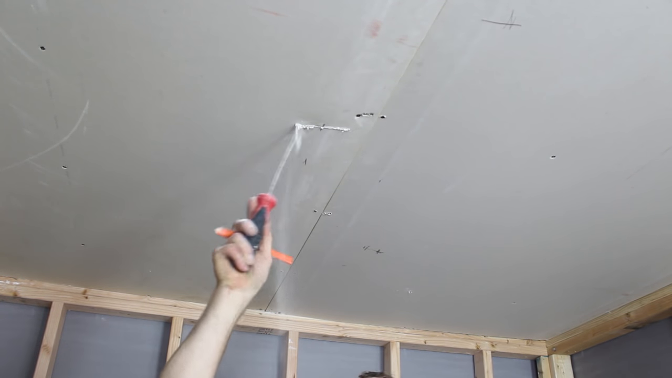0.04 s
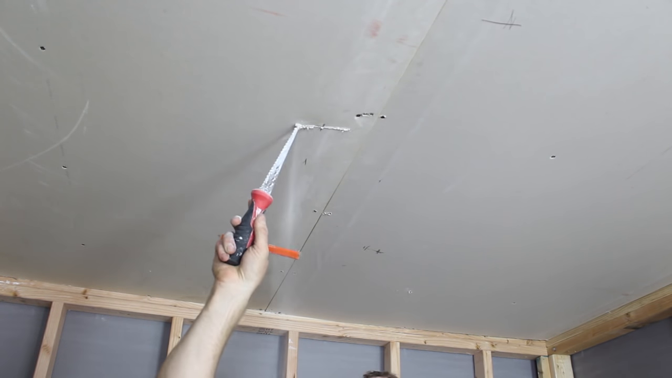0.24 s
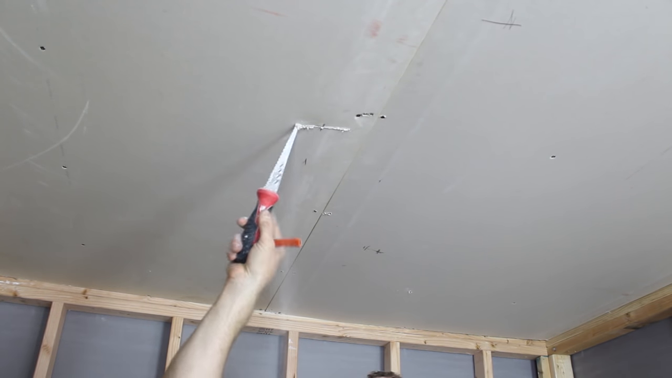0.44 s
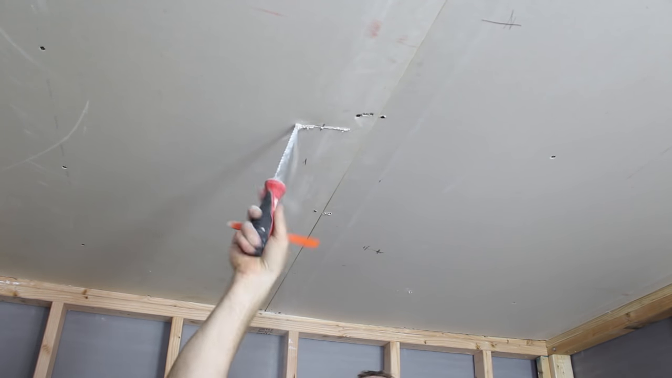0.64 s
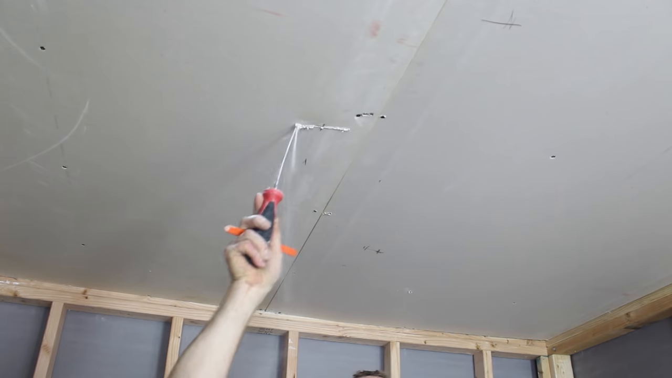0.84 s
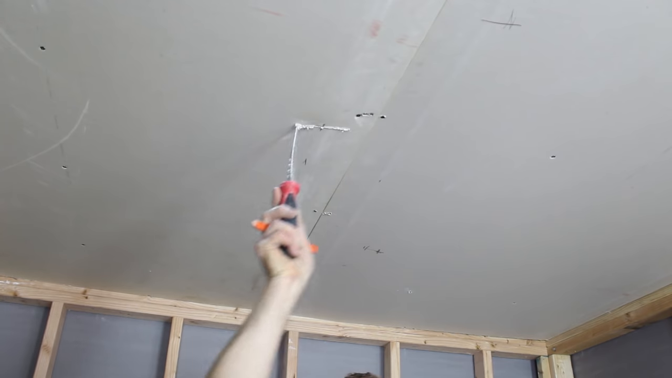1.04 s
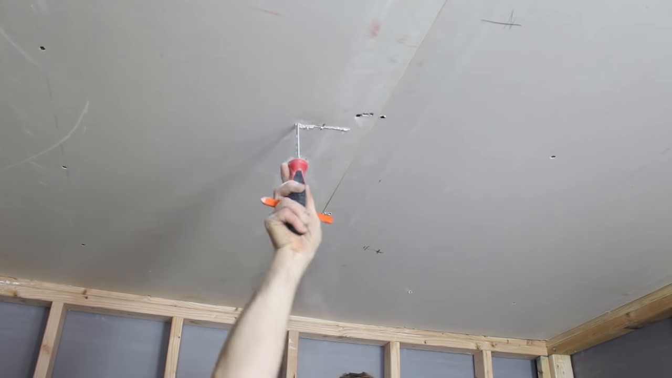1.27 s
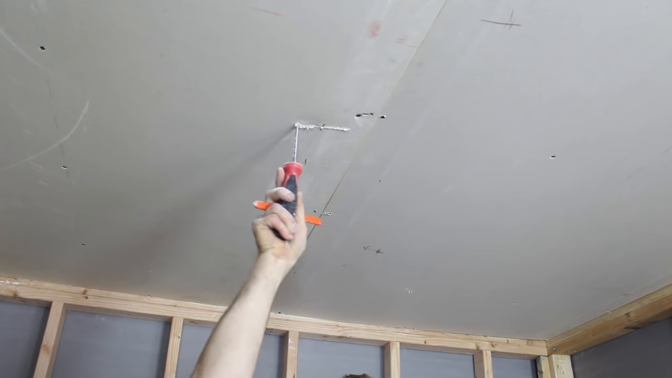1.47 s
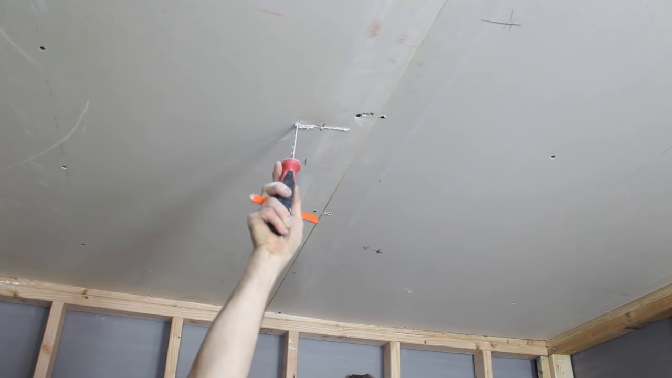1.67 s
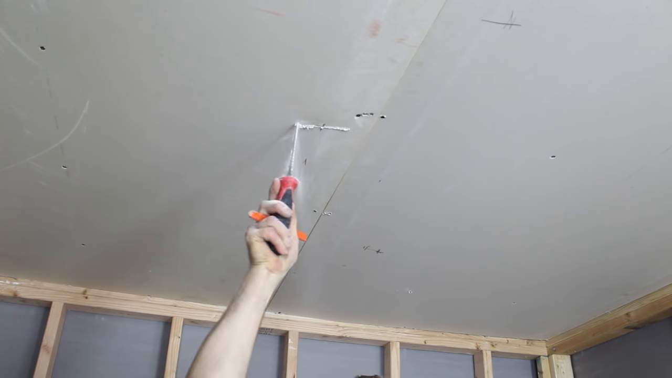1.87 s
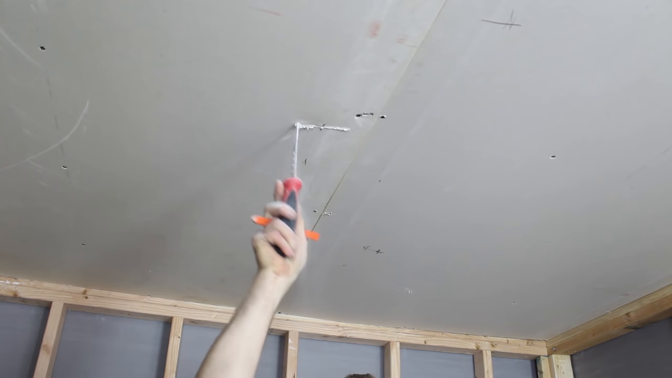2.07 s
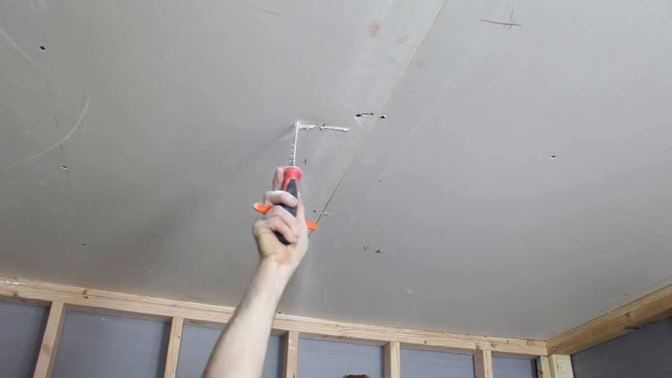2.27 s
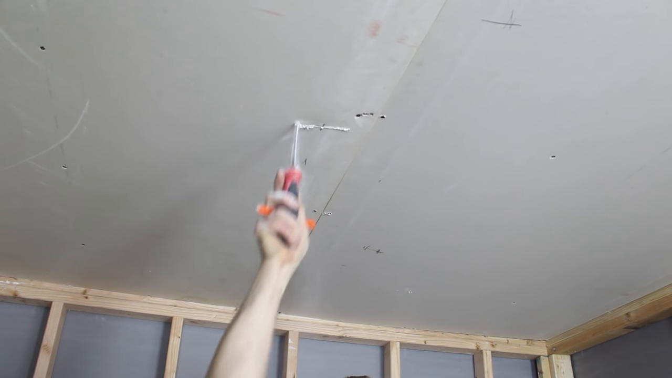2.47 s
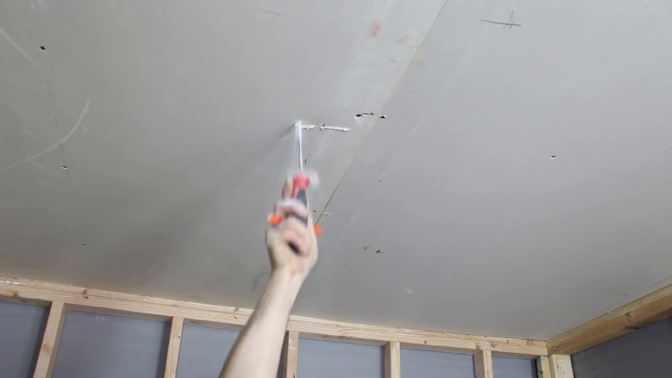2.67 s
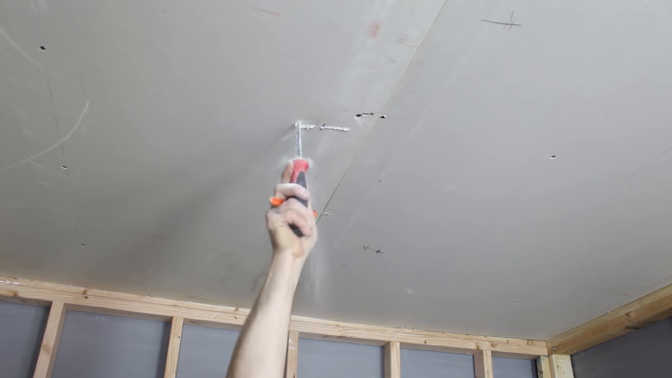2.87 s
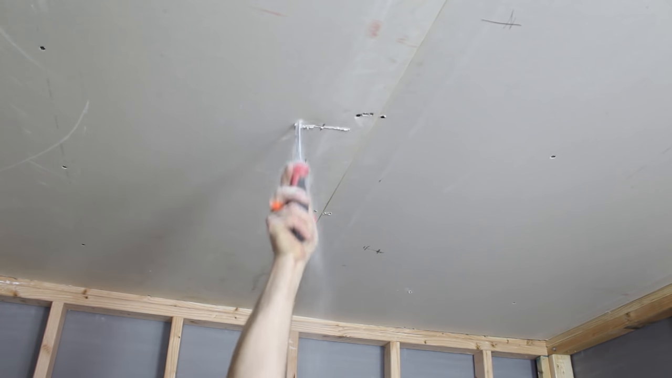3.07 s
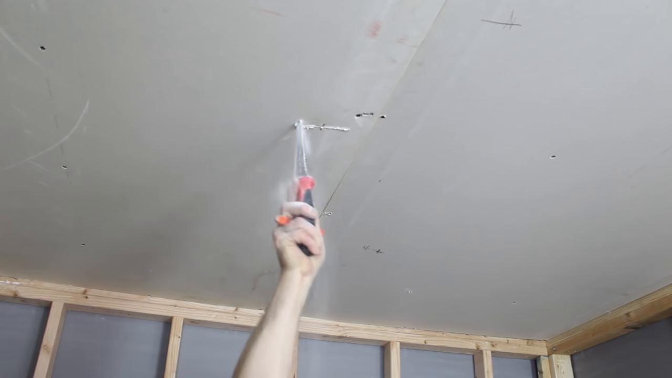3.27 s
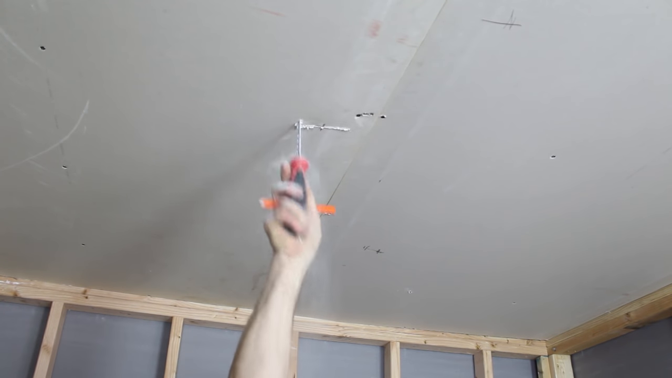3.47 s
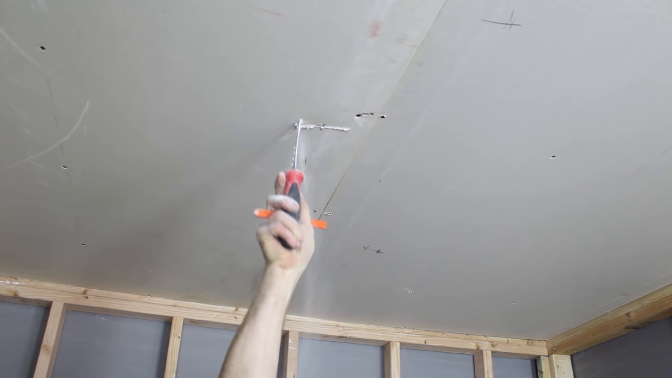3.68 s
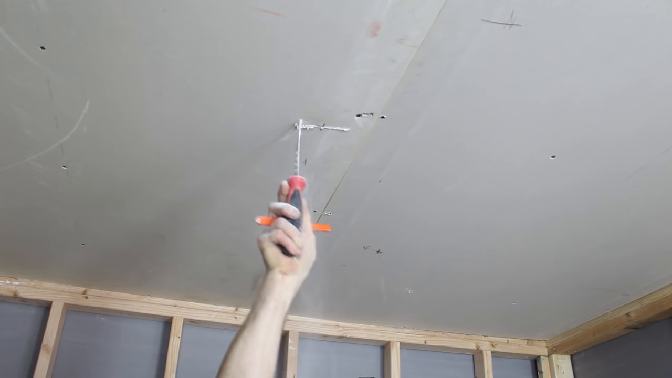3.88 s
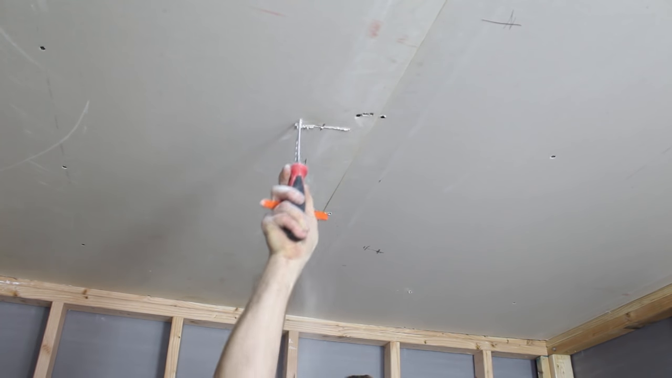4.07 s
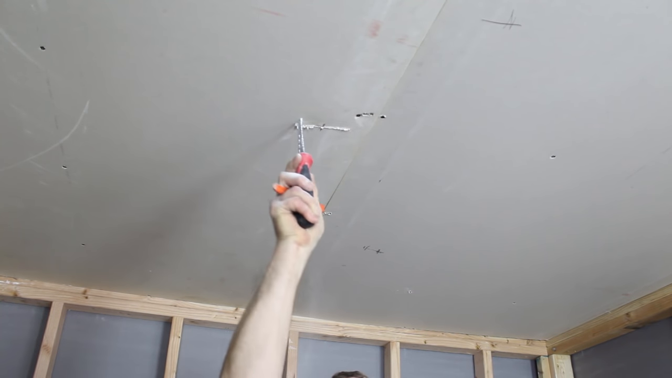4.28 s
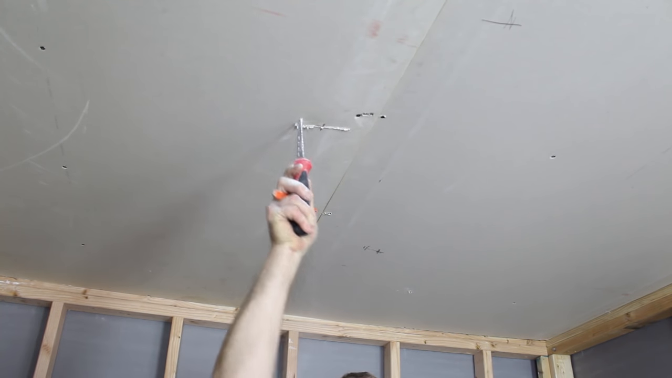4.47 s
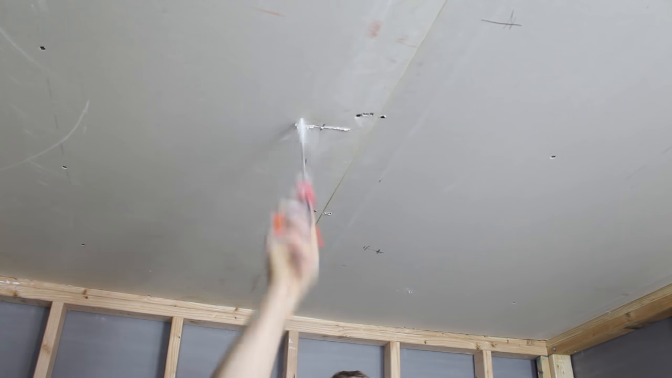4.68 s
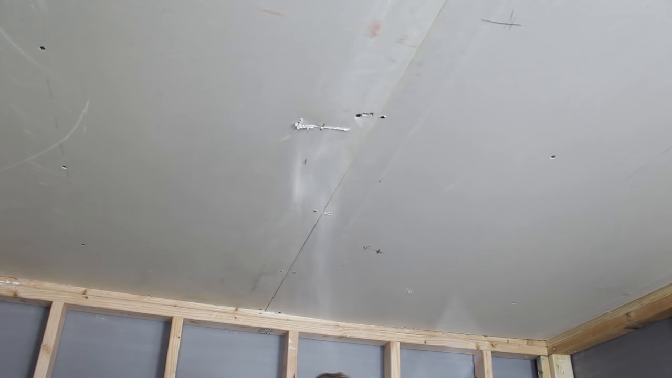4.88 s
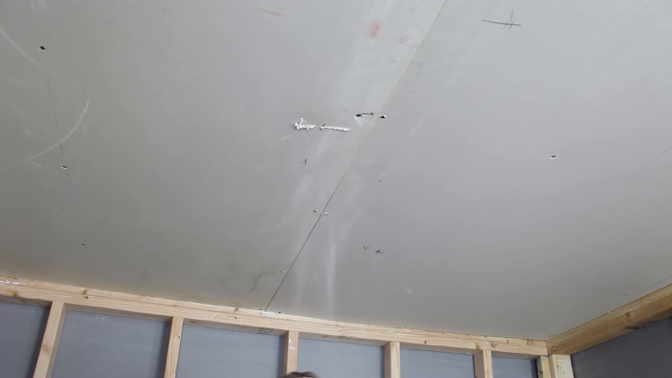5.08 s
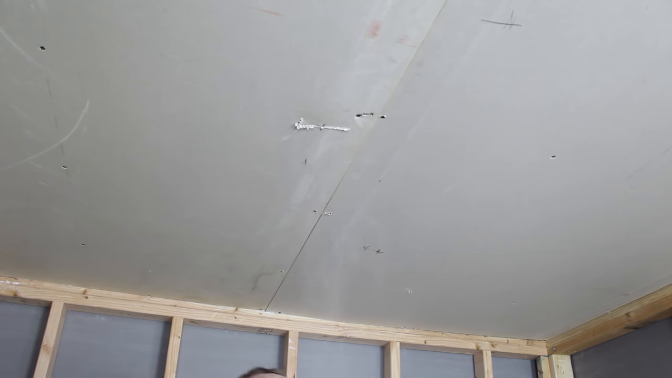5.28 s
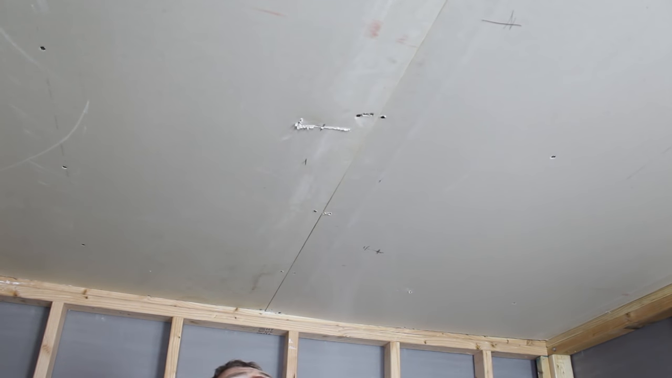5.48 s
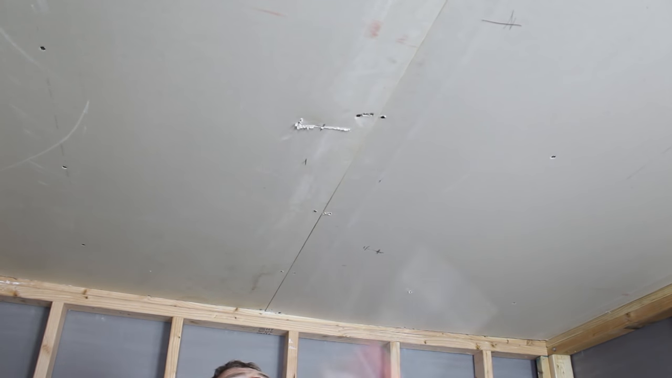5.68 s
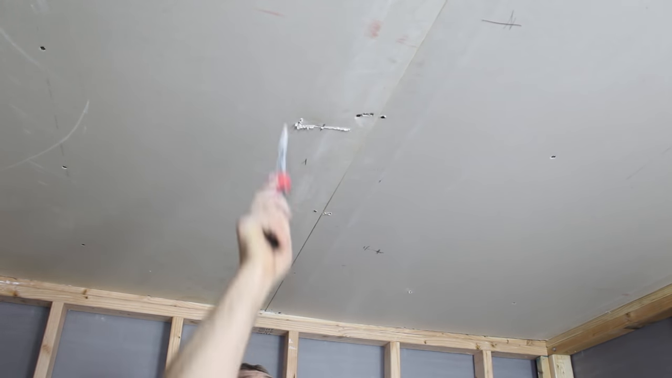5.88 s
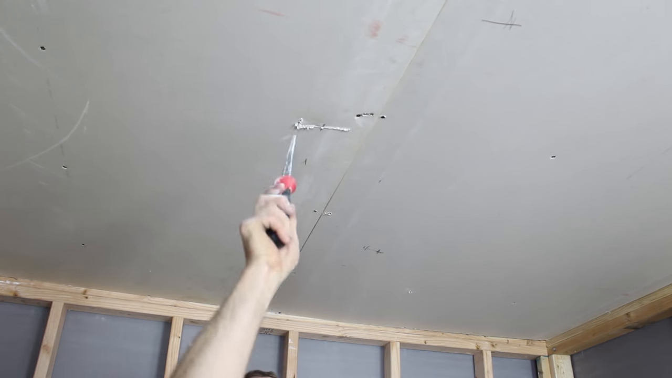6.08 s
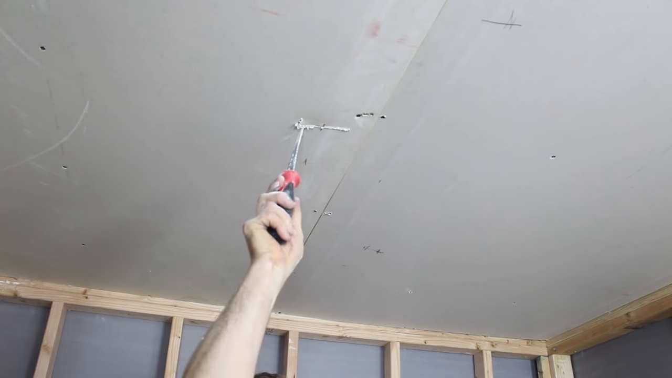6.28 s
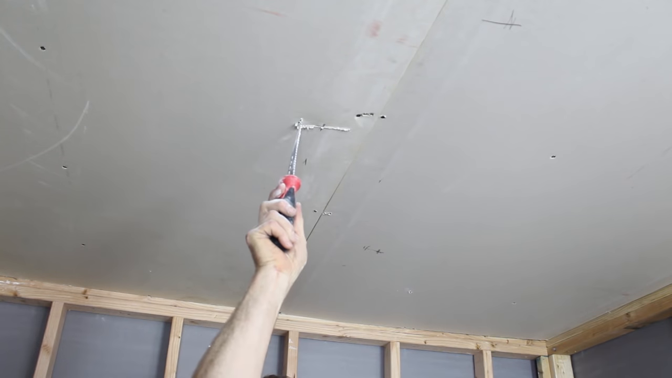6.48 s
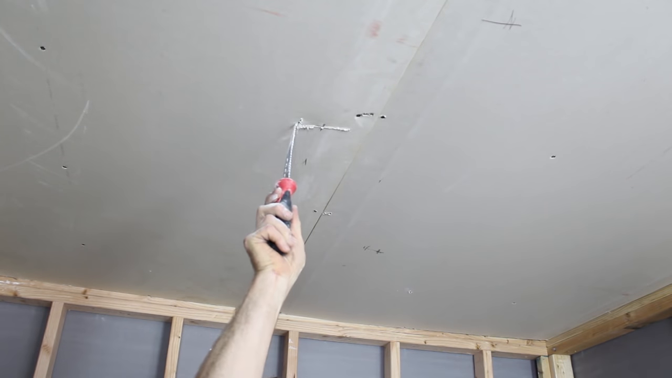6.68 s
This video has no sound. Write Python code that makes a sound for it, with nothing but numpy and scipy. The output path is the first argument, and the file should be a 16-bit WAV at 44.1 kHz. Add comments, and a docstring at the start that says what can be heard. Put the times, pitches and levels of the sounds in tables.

```python
"""First come faint, short rasps over quiet air; soon a jab saw bites hard into a plasterboard ceiling.
The room is bare and framed, the microphone a step or two from the saw.
Teeth dragged through gypsum are gritty noise bursts that ring the blade and drum the sheet.
The tip knocks the board and crumbs tick; once the strokes end, a sleeve rustles as filtered noise."""
import sys
import numpy as np
from scipy import signal
from scipy.io import wavfile
from scipy.ndimage import uniform_filter1d

SR = 44100
rng = np.random.default_rng(int(sys.argv[2]) if len(sys.argv) > 2 else 0)


def pcm_store(signal):
    """Save signal as 16-bit PCM."""
    levels = np.round(np.clip(np.atleast_2d(signal), -1, 1) * 32767)
    wavfile.write(sys.argv[1], SR, levels.astype(np.int16).T)


def volts_from_db(level):
    """Convert decibel levels to linear amplitude ratios."""
    exponent = np.asarray(level, float) / 20
    return 10 ** exponent


N = 296793  # length in samples


def evened(x):
    """Scales to rms 1."""
    return x / np.sqrt(np.mean(x ** 2) + 1e-20)


def slow_noise(samples):
    """Noise smoothed over some samples, rms 1."""
    return evened(uniform_filter1d(rng.standard_normal(N), samples))


def read(points, hz):
    """Reads a table along log frequency."""
    f, value = np.transpose(points)
    return np.interp(np.log(hz + 1), np.log(f + 1), value)


def colour(x, points):
    """Minimum-phase filter with the given spectrum that keeps the rms of white noise."""
    level_db = np.maximum(read(points, np.fft.rfftfreq(4096, 1 / SR)), -100)
    half = np.log(volts_from_db(level_db))
    whole = np.r_[half, half[-2:0:-1]]
    phase = -signal.hilbert(whole).imag
    taps = np.fft.ifft(np.exp(whole + 1j * phase)).real[:2048]
    return signal.oaconvolve(x, taps / np.linalg.norm(taps))[:N]


def ring(x, modes, rise_s):
    """Dying sines struck by x: neighbours in opposite phase, a soft onset, total energy 1."""
    t = np.arange(SR // 2) / SR
    taps = np.zeros(len(t))
    for k, (hz, db, t60) in enumerate(modes):
        decay = volts_from_db(db - 60 * t / t60) / np.sqrt(t60)
        taps += (-1) ** k * decay * np.sin(2 * np.pi * hz * t)
    taps *= 1 - np.exp(-t / rise_s)
    return signal.oaconvolve(x, taps / np.linalg.norm(taps))[:N]


def envelope(rows, peak_db, start_db, end_db, rise_s, fall_s, bulge):
    """Each row swells from start to peak and sinks to its end (dB re peak); bulge rounds the swell."""
    out = np.zeros(N + SR)
    ends = end_db + np.zeros(len(rows))
    for (start, up, down), top, end in zip(np.array(rows)[:, :3], peak_db, ends):
        t = np.arange(0, up + down + 5 * fall_s, 1 / SR)
        fade = np.clip(t / rise_s, 0, 1) * np.exp(-np.maximum(t - up - down, 0) / fall_s)
        corners = volts_from_db(np.array([start_db, 0, end]) * bulge)
        shape = np.interp(t, [0, up, up + down], corners) ** (1 / bulge)
        out[round(start * SR):][:len(t)] += volts_from_db(top) * fade * shape
    return out[:N]


def spikes(s, db):
    """One impulse at each time."""
    out = np.zeros(N)
    np.add.at(out, np.round(np.asarray(s) * SR).astype(int), volts_from_db(db))
    return out


def bursts(train, length_s):
    """Turns impulses into swells that peak after length_s and fade."""
    u = np.arange(2000) / SR / length_s
    return signal.oaconvolve(train, u * np.exp(1 - u))[:N]


def grains(spread_db):
    """Noise whose samples now and then jump out, as crumbs break."""
    jump = np.minimum(rng.exponential(1, N), 6)
    return evened(rng.standard_normal(N) * volts_from_db(spread_db * jump))


def powdery(x):
    """A difference and a gentle band-pass keep mostly the treble, as of fine powder."""
    dust_hz = (7940, 11500)
    return signal.lfilter(*signal.butter(1, dust_hz, "band", fs=SR), np.diff(x, prepend=0))


# Spectrum of the quiet room air: f/Hz, relative level per Hz/dB
AIR_SPECTRUM = [(18, -48), (30, -16), (144, 7), (692, -10.5), (788, -3.5), (1820, -14.5), (2560, -15),
                (2990, -17), (15500, -32.5)]


def air():
    """The quiet of the room: coloured noise, swelling a little."""
    slow = uniform_filter1d(uniform_filter1d(rng.standard_normal(N), 4000), 4000)
    swell = volts_from_db(0.58 * evened(slow))
    return volts_from_db(-56.5) * swell * colour(rng.standard_normal(N), AIR_SPECTRUM)


# Decay of the bare room: f/Hz, t60/s
ROOM_DECAY = [(100, 0.27), (300, .35), (1000, 0.53), (2500, 0.33), (6000, .22), (12000, 0.28)]


def room(x):
    """Three sparse echo tails, each band dying at its own speed, fed in turn at constant power."""
    out, t = np.zeros(N), np.arange(N) / SR
    for k in range(3):
        taps = np.zeros(SR // 2)
        at = np.arange(200, SR // 2 - 20, 20)
        taps[at + rng.integers(0, 20, len(at))] = rng.choice([-1., 1.], len(at))
        hz, s, bands = signal.stft(taps, SR, nperseg=512)
        decay = volts_from_db(-60 * s / read(ROOM_DECAY, hz)[:, None])
        tail = signal.istft(bands * decay, SR, nperseg=512)[1]
        turn = np.sqrt(2 / 3) * np.cos(np.pi * (t * 3 + k / 3))
        out += signal.oaconvolve(x * turn, tail / np.linalg.norm(tail))[:N]
    return out


# Movements of the arm: start t/s, rise t/s, fall t/s, noise level before the filter/dB, end re peak/dB
ARM_MOVES = [(4.9, 0.0071, .2, -53, -2), (5.119, 0.047, 0.076, -43, -19.5), (5.391, .008, 0.26, -56.5, -5),
             (5.69, 0.056, 0.21, -42.5, -32.5), (6.449, 0.013, 0.21, -58.5, -2.5)]
# Spectrum of rubbing cloth: f/Hz, relative level per Hz/dB
CLOTH_SPECTRUM = [(88, -54), (150, -6), (290, -4), (333, -6), (560, -3.5), (3620, -12.5), (15500, -43)]


def sleeve():
    """Cloth and dust: soft clumped noise with a few sharper scuffs."""
    scuffs = (rng.random(N) < 40 / SR) * rng.random(N)  # about 40 a second
    clumps = volts_from_db(2.0 * slow_noise(400)) + 0.84 * bursts(scuffs, 0.0015)
    top_db, end_db = np.transpose(ARM_MOVES)[3:]
    moves = envelope(ARM_MOVES, top_db, -6.5, end_db, 0.0075, 0.015, bulge=0.22)
    return colour(moves * clumps * rng.standard_normal(N), CLOTH_SPECTRUM)


# Single crumbs snapping off: t/s, burst level before the treble filter/dB
CRUMB_SNAPS = [(0.4264, -52.5), (0.7517, -44.5), (4.2637, -44.5)]


def crumbs():
    """Each crumb that snaps off is a tiny burst of treble noise."""
    snaps = bursts(spikes(*np.transpose(CRUMB_SNAPS)), 0.0023)
    return powdery(snaps * rng.standard_normal(N))


# Pings of the freed blade: t/s, level/dB, f/Hz
BLADE_PINGS = [(4.286, -49, 12860), (4.80, -56, 12860), (6.072, -58, 7560)]


def pings():
    """The freed blade pings: thin sines that die by 60 dB in 0.081 s."""
    t = np.arange(SR // 4) / SR
    out = np.zeros(N)
    for at, db, hz in BLADE_PINGS:
        tone = volts_from_db(-60 * t / 0.081) * np.sin(2 * np.pi * hz * t)
        out += signal.oaconvolve(spikes([at], [db]), tone)[:N]
    return out


# Drum modes of the ceiling board: f/Hz, relative level/dB, t60/s
SHEET_MODES = [(78.7, -6, 0.14), (116.9, -11.5, 0.086), (165.1, -3.5, 0.15), (185.6, -4.5, 0.082),
               (214.5, -2.5, 0.12), (241.4, -8, 0.38), (275.8, -2, 0.058), (335.6, -5, 0.16),
               (354.3, -3, 0.08), (388, -6.5, 0.058), (429.7, -12, 0.36), (474, -9.5, 0.065),
               (584, -10, 0.073), (877, -16.5, 0.039)]
# Drive of one extra-strong mode as the tool moves over the sheet: t/s, level/dB
MODE_DRIVE = [(0, 1), (1.9, -7.5), (2.6, -6), (3.299, -17.5), (4.5, -17), (5.2, -9.5), (6.2, 0)]


def sheet(x):
    """The ceiling board drums; its bending waves need a moment to spread."""
    drive = volts_from_db(np.interp(np.arange(N) / SR, *np.transpose(MODE_DRIVE)))
    return ring(x, SHEET_MODES, rise_s=0.0011) + ring(x * drive, SHEET_MODES[2:3], rise_s=0.0048)


def knocked_sheet(force):
    """A blow drums the whole board and drives some of its modes more strongly."""
    drum = volts_from_db(-12) * sheet(force)
    drum += volts_from_db(-10) * ring(force, SHEET_MODES[3:5], rise_s=0.00091)
    return drum + volts_from_db(-11.5) * ring(force, SHEET_MODES[11:], rise_s=0.0009)


# Blows of the tip, and some crumb ticks: t/s, click drive level/dB, thud drive level/dB, contact t/ms
BLOWS_AND_TICKS = [(0.3272, -42.5, -76, 1), (0.396, -39.5, -83, 0.83), (0.551, -38, -40, 0.62),
                   (0.583, -39, -15, 1), (1.05, -49, -63, .6), (1.304, -31, -10, 0.77), (1.653, -26, -38, 0.54),
                   (1.792, -40, -14, 0.65), (2.03, -48, -47, 0.83), (3.809, -38.5, -48.5, .6),
                   (3.926, -53, -30, 0.57), (4.4148, -37, -42.5, 0.23), (5.045, -46.5, -61, .6),
                   (5.3073, -51, -41.5, 0.81), (5.335, -50, -64, .6), (5.3989, -37, -60, 0.6),
                   (5.601, -50.5, -66.5, 0.58), (6.0194, -18, -17, 0.44), (6.301, -62.5, -69.5, .6),
                   (6.361, -37.5, -25.5, 0.77), (6.665, -52, -66.5, 0.65), (6.696, -44.5, -71, 0.55)]
# Spectrum of the tip's click: f/Hz, relative level per Hz/dB
CLICK_SPECTRUM = [(300, 7.5), (700, -5), (3700, 0.5), (5000, -11.5), (15000, -30.5)]


def knocks():
    """The tip clicks and drums the sheet, duller for a long contact; the paper face slaps the core. Some rows
    are crumb ticks, played the same way."""
    s, click_db, thud_db, contact_ms = np.transpose(BLOWS_AND_TICKS)
    hits = spikes(s, click_db)
    crack = bursts(hits, 0.0004) + volts_from_db(-10.0) * bursts(hits, 0.0041)  # then the board chatters
    click = colour(crack * rng.standard_normal(N), CLICK_SPECTRUM)
    flap = bursts(hits, 0.0067) * rng.standard_normal(N)
    slap = volts_from_db(3) * signal.lfilter(*signal.butter(2, (433, 870), "band", fs=SR), flap)
    force = np.zeros(N)
    for at, db, ms in zip(s, thud_db, contact_ms):
        force += bursts(spikes([at], [db]), ms / 1000) / ms
    return click + slap + knocked_sheet(force)


# Resonances of the damped steel blade: f/Hz, relative level/dB, t60/s
BLADE_MODES = [(2191, 0, 0.0087), (3132, -9.5, 0.026), (3418, -1.5, 0.0063), (3986, 3, 0.0056),
               (6420, -10.5, 0.0016), (6795, -19, 0.0017)]


def blade(x, first=0, last=None):
    """The damped steel answers in a few wide resonances, all or a slice of them."""
    return ring(x, BLADE_MODES[first:last], rise_s=0.00051)


# Spectrum of crumbling gypsum: f/Hz, relative level per Hz/dB
GRIT_SPECTRUM = [(350, -31), (600, -2), (1130, -7), (2870, -5.5), (4710, -14), (6320, -19.5), (12000, -34)]


def grit(x):
    """Crumbling gypsum colours the noise of the teeth."""
    return colour(x, GRIT_SPECTRUM)


# Hardest single bites: t/s, lower blade and grit drive level/dB, upper blade drive level/dB
HARD_BITES = [(1.1879, -17, -42), (1.295, -11.5, -39), (1.3055, -9.5, -28), (1.3294, -10.5, -25),
              (1.7932, -11.5, -21), (1.8196, -10, -14.5), (2.2688, -13.5, -29.5), (2.406, -19, -24.5),
              (2.5529, -20.5, -22), (2.579, -2, -16), (2.6042, -7.5, -14.5), (2.7152, -12.5, -16.5),
              (2.7277, -0.5, -14.5), (2.74, -9, -16.5), (2.7509, -6, -12), (2.8479, -9, -24),
              (2.885, -9.5, -16.5), (2.9892, -4, -13.5), (3.0103, -3.5, -11), (3.023, -1, -5.5),
              (3.033, 2, -12), (3.1432, -7.5, -22), (3.1576, -7.5, -18), (3.273, 0, -16), (3.296, -1, -8),
              (3.3059, 1, -7), (3.409, -7.5, -18.5), (3.4212, -2.5, -23.5), (3.4432, -10, -19),
              (4.7021, -21, -29)]


def bites(catch, stroke):
    """Hard bites ring the lower blade, every catch its upper modes; also returns the upper drive."""
    s, low_db, high_db = np.transpose(HARD_BITES)
    crumbling = grains(spread_db=1.5)
    hard = bursts(spikes(s, low_db), 0.0013) * crumbling
    catches = volts_from_db(-6) * catch * stroke ** 1.284
    bright = bursts(spikes(s, high_db) + catches, 0.001) * crumbling
    sound = volts_from_db(-4.5) * blade(hard, 1, 4) + blade(bright, 4) + volts_from_db(-24.5) * grit(hard)
    return sound, bright


# Strokes of the saw: start t/s, rise t/s, fall t/s, rasp drive level/dB, push on the sheet level/dB
SAW_STROKES = [(0.026, 0.014, 0.095, -35, -37), (0.068, 0.032, 0.027, -37.5, -58),
               (0.464, 0.029, 0.14, -48.5, -48.5), (0.539, 0.053, .07, -34, -26),
               (0.699, 0.045, 0.17, -44.5, -45), (0.9, 0.054, 0.23, -46, -47),
               (1.136, .03, 0.098, -40, -38.5), (1.184, 0.0115, 0.095, -30, -26.5),
               (1.262, 0.07, 0.1, -17.5, -12.5), (1.499, 0.049, 0.033, -37.5, -36),
               (1.638, 0.013, 0.054, -33.5, -22), (1.773, 0.051, 0.092, -20.5, -14.5),
               (1.918, 0.0065, 0.19, -37, -32), (2.138, 0.024, 0.082, -31.5, -35.5),
               (2.21, .016, 0.037, -31, -26.5), (2.263, 0.018, 0.058, -24, -18),
               (2.398, 0.035, 0.093, -23, -20.5), (2.516, 0.079, 0.14, -16.5, -11.5),
               (2.698, 0.051, .1, -19, -14.5), (2.822, 0.062, 0.074, -17, -12),
               (2.973, 0.052, 0.058, -11.5, -8.5), (3.123, 0.033, .085, -17, -10),
               (3.258, .04, 0.11, -15, -10), (3.398, 0.05, 0.058, -13.5, -9),
               (3.548, 0.046, 0.059, -28, -24), (3.6, 0.06, 0.093, -28.5, -24),
               (3.913, 0.029, 0.12, -32.5, -30), (4.019, .018, 0.062, -37, -32.5),
               (4.113, .035, 0.071, -26.5, -19.5), (4.17, 0.036, 0.066, -29, -24.5),
               (4.41, 0.018, 0.068, -47.5, -42.5), (4.55, 0.042, 0.048, -35.5, -32.5),
               (4.697, 0.058, 0.048, -20, -16)]


def saw():
    """Teeth catch at an uneven pace; each catch releases grit into blade and sheet."""
    teeth_per_s, bite_s = 95, 0.0028  # typical pace, time of a catch to its peak
    full_bite_db, smooth_per_db = -19, 1.1  # lighter strokes glide over the teeth
    pace = teeth_per_s * np.exp(0.3 * slow_noise(500))
    passed = np.floor(np.cumsum(pace) / SR)
    catch = np.diff(passed, prepend=0) * volts_from_db(4 * rng.standard_normal(N))
    teeth = evened(0.35 + bursts(catch, bite_s))

    rasp_db, push_db = np.transpose(SAW_STROKES)[3:]
    stroke = envelope(SAW_STROKES, rasp_db, -16, -28.5, 0.008, 0.0081, bulge=0.21)
    above_full_db = 20 * np.log10(stroke + 1e-6) - full_bite_db
    teeth = teeth ** np.clip(2 + smooth_per_db * above_full_db, 0.3, 1)
    rasp = volts_from_db(-4.5) * blade(teeth * stroke * grains(spread_db=2.5))
    rasp += volts_from_db(-2.0) * grit(teeth * stroke * grains(spread_db=2.0))
    bite_sound, bright = bites(catch, stroke)

    # powder hiss grows with the rasp, less when pushing hard
    powder_db = -22 + 1.22 * rasp_db - 0.41 * push_db
    powder = envelope(SAW_STROKES, powder_db, -14, -39.5, 0.012, 0.012, bulge=0.2)
    dust = teeth * powder * grains(spread_db=5.5)
    hiss = powdery(dust + volts_from_db(-11.0) * bright)

    push = envelope(SAW_STROKES, push_db, -10.5, -28.5, 0.0088, 0.037, bulge=0.12)
    push = teeth ** 0.24 * push * rng.standard_normal(N)  # the heavy sheet feels the teeth less
    return rasp + bite_sound + hiss + sheet(push)


def scene():
    """All sources with the room around them."""
    near = sleeve() + crumbs() + pings() + knocks() + saw()
    return (near + volts_from_db(-7.0) * room(near) + air())[None]


def low_pass(x):
    """Removes everything above the highest recorded frequency."""
    return signal.sosfilt(signal.butter(12, 15690, fs=SR, output="sos"), x)


def record(dry):
    """The microphone drops the deepest bass, and the loudest bites clip at full scale."""
    low_cut = signal.butter(4, 67, "high", fs=SR, output="sos")  # Hz
    thin = signal.sosfilt(low_cut, dry)
    mix = np.clip(thin, -1, 1)
    return low_pass(mix)


dry = scene()
out = record(dry)
pcm_store(out)
```